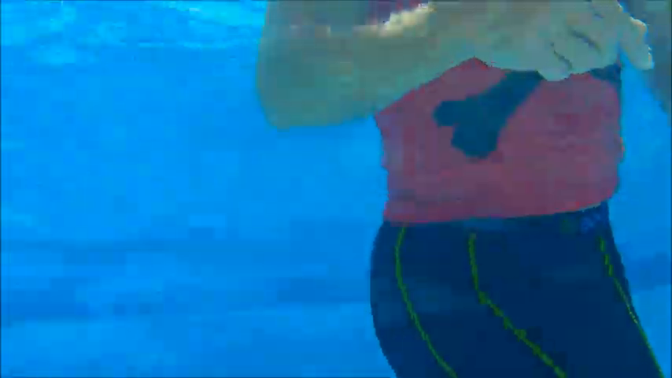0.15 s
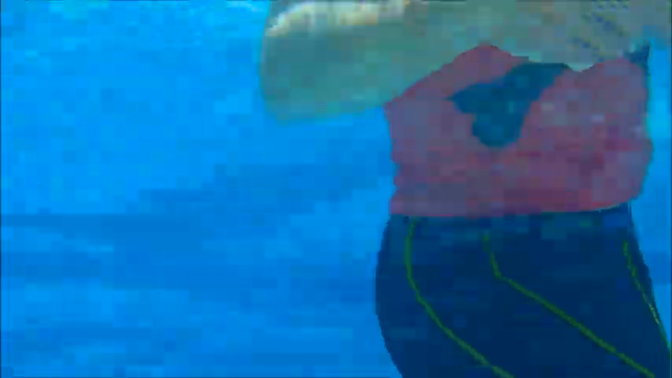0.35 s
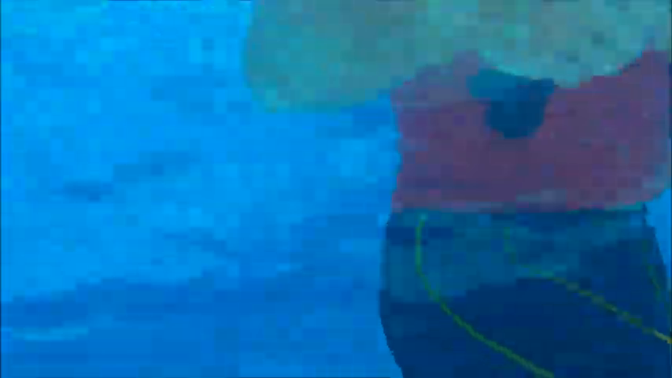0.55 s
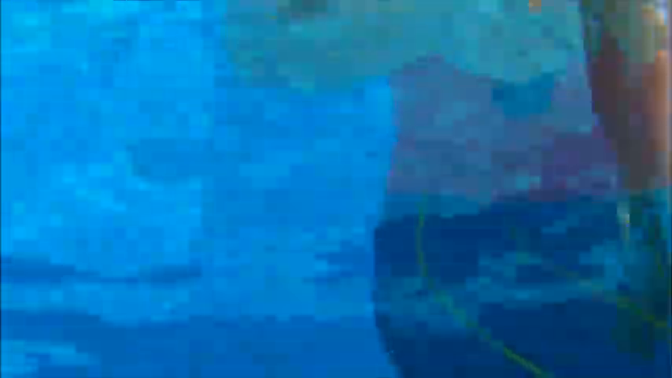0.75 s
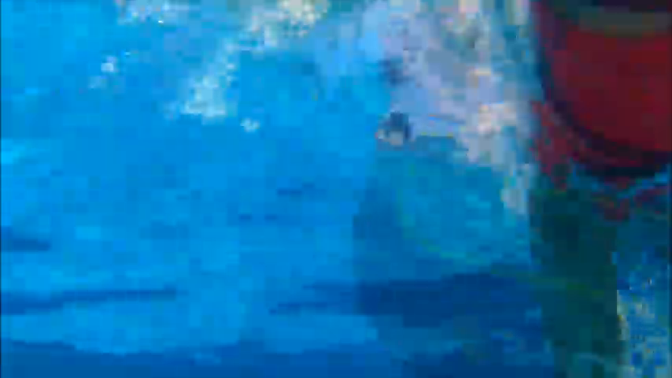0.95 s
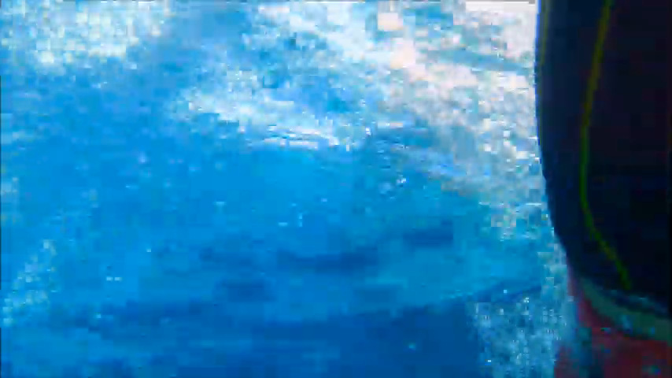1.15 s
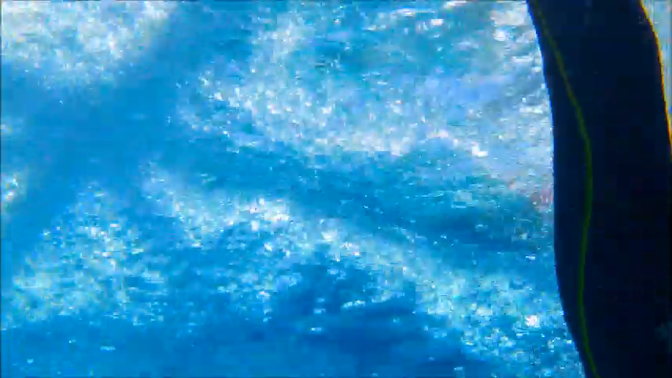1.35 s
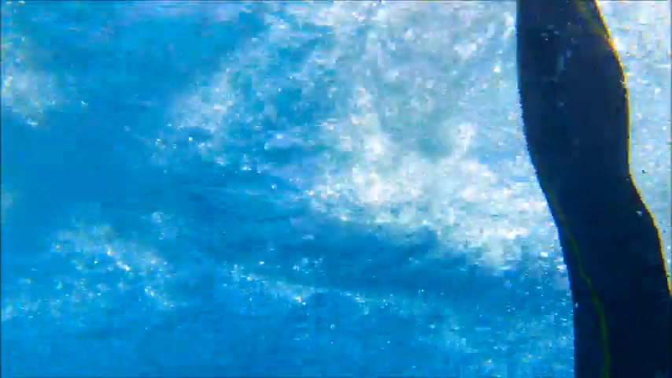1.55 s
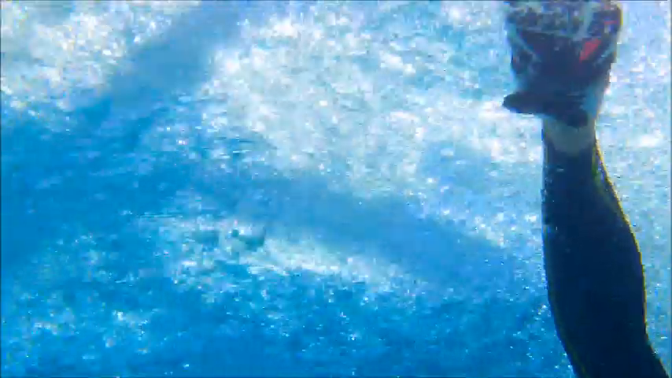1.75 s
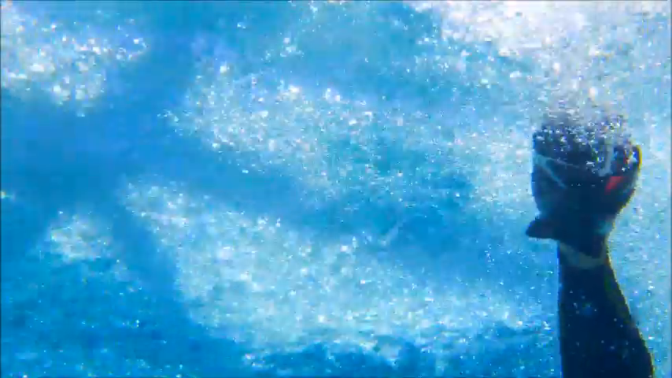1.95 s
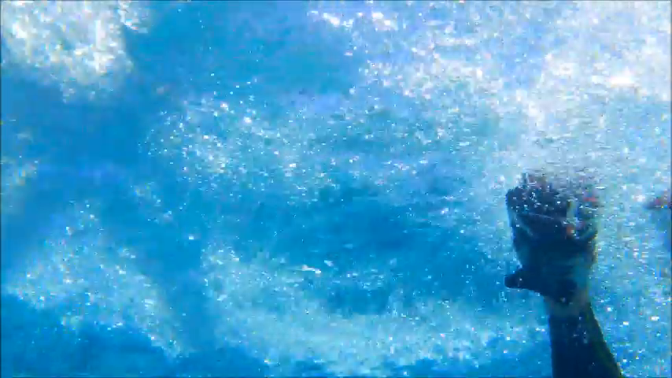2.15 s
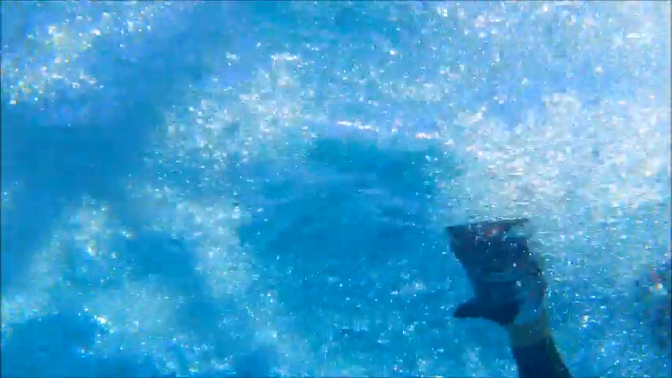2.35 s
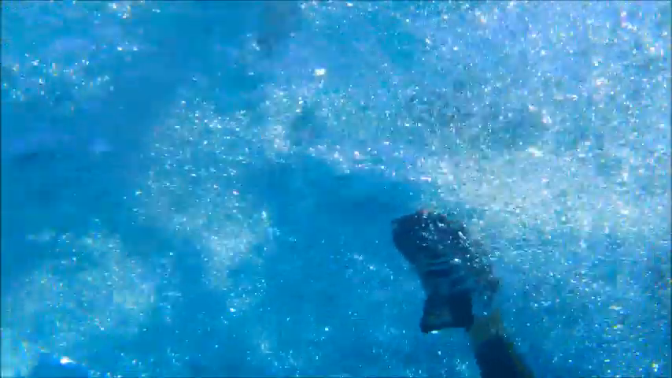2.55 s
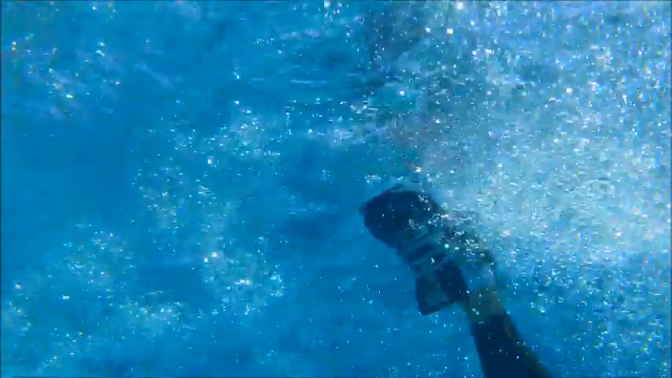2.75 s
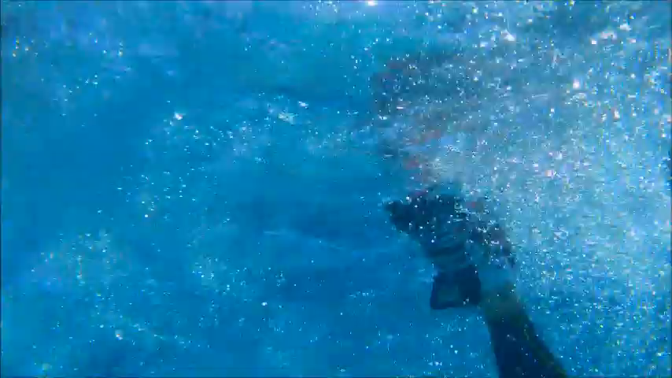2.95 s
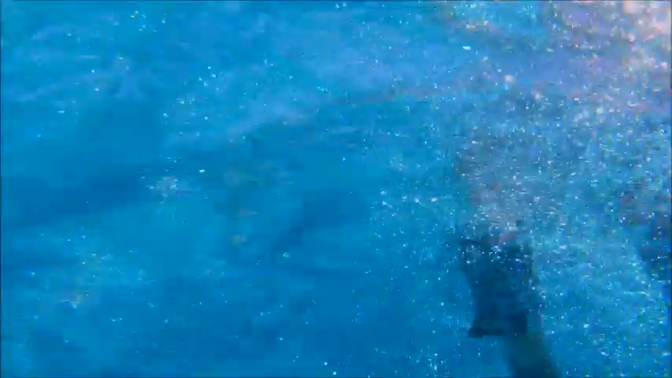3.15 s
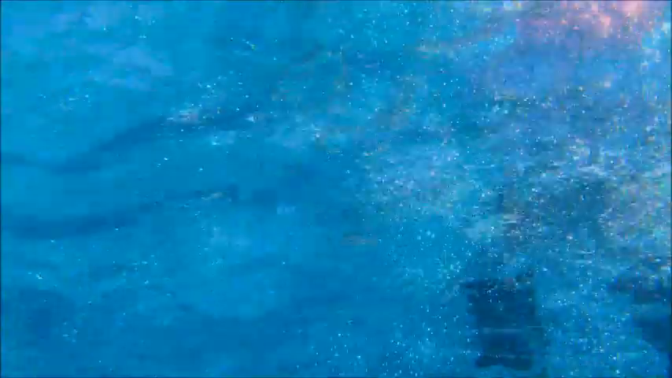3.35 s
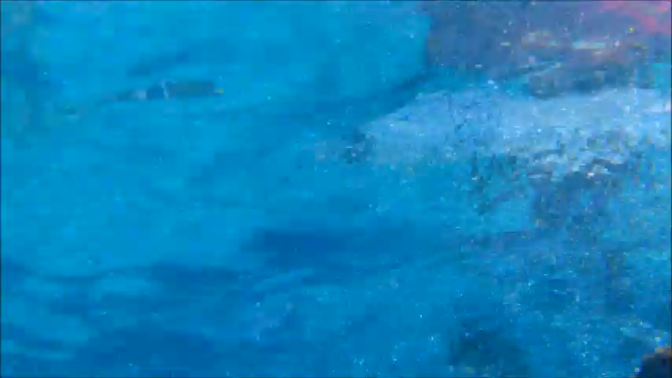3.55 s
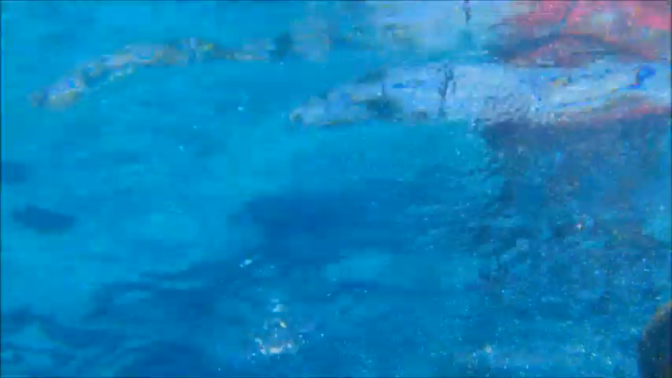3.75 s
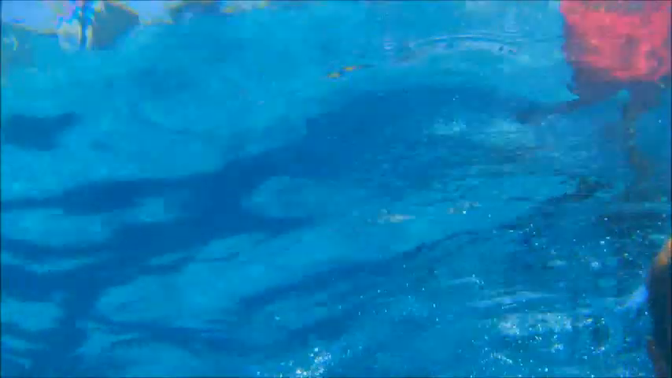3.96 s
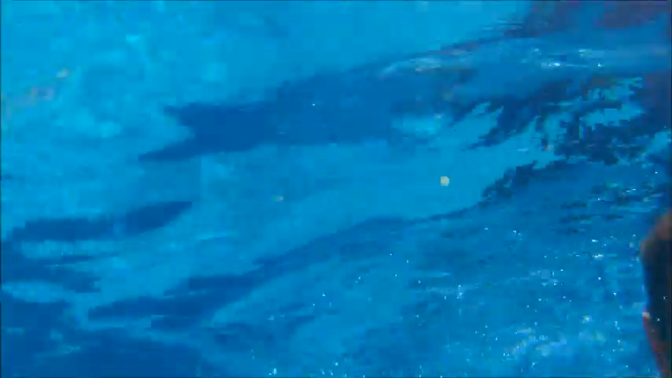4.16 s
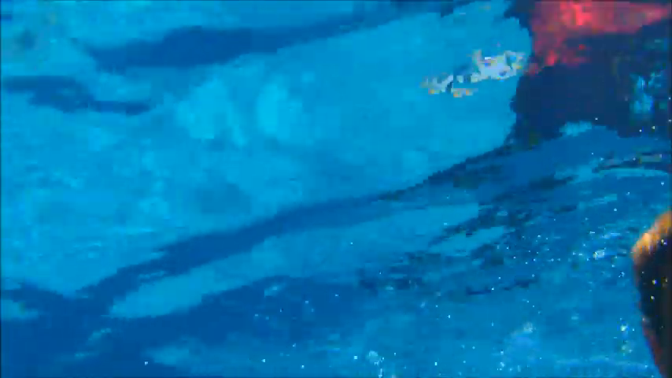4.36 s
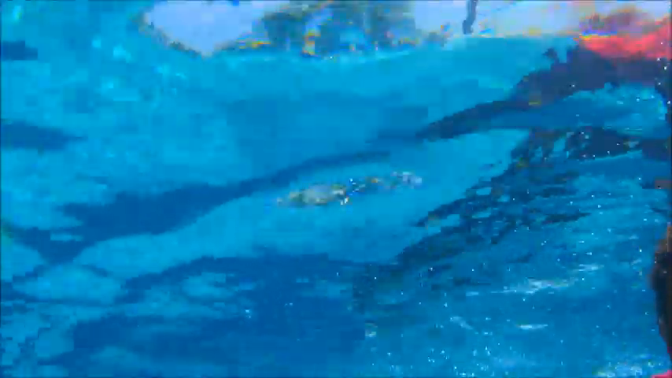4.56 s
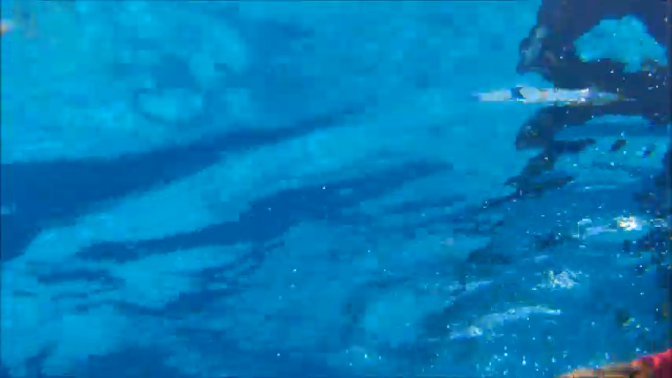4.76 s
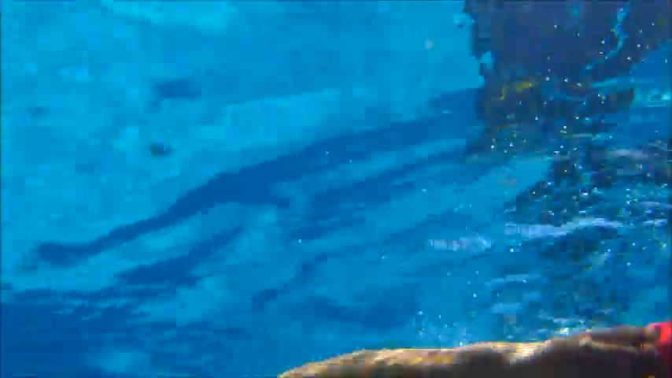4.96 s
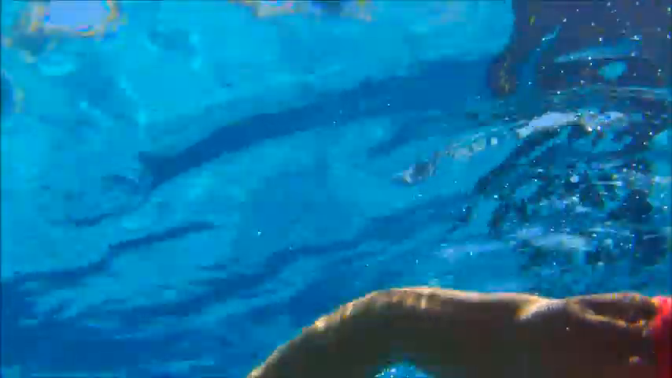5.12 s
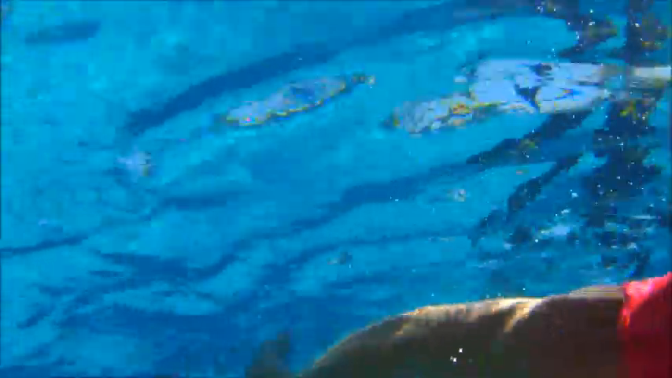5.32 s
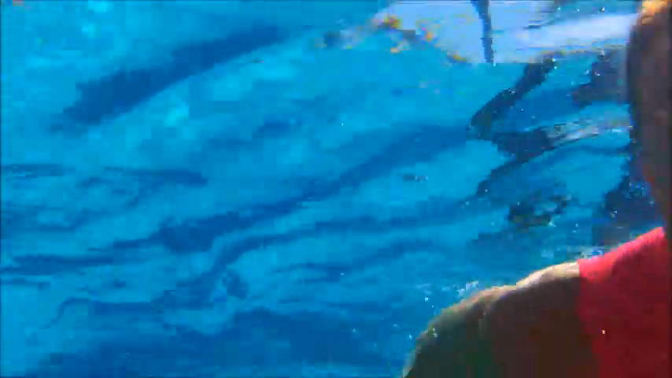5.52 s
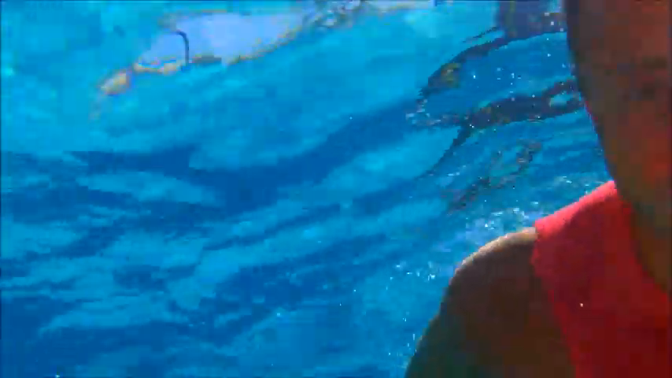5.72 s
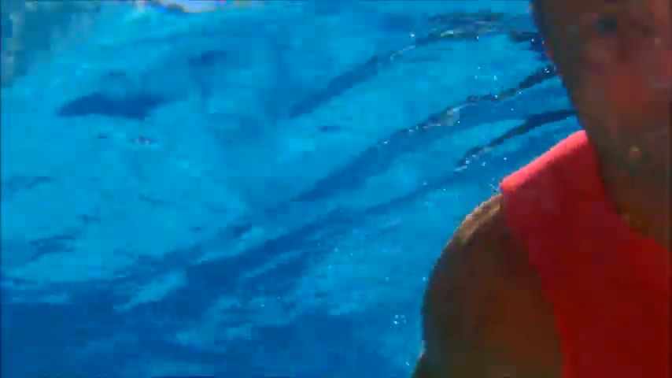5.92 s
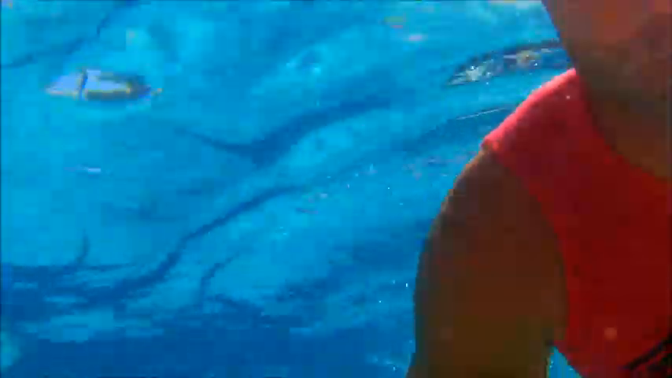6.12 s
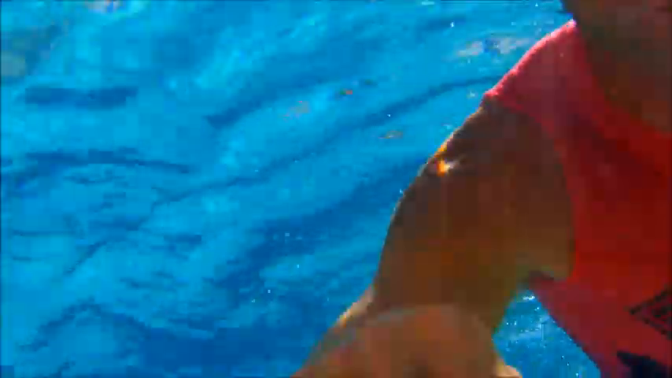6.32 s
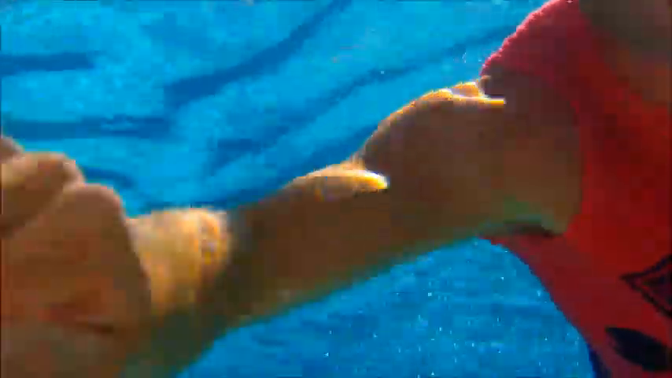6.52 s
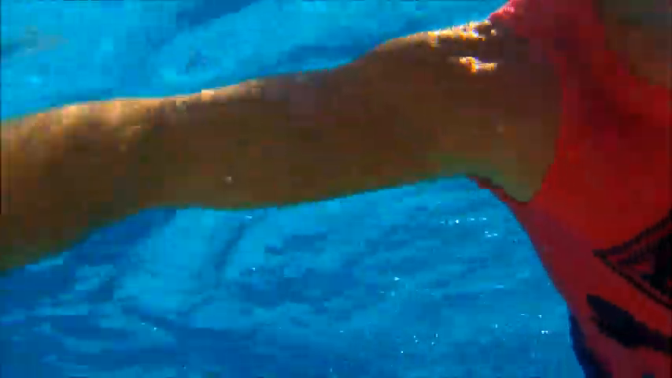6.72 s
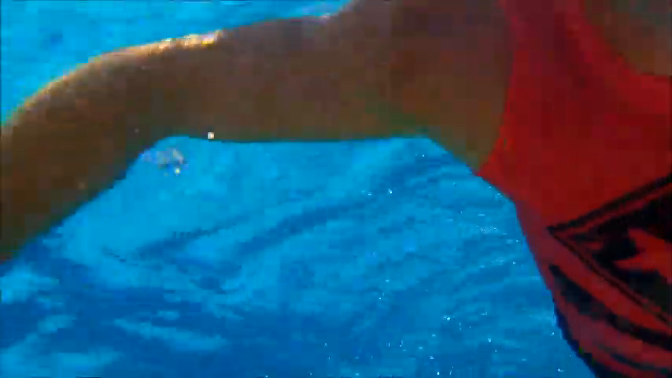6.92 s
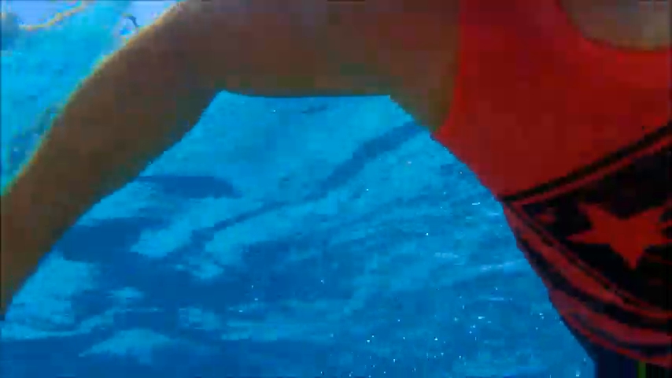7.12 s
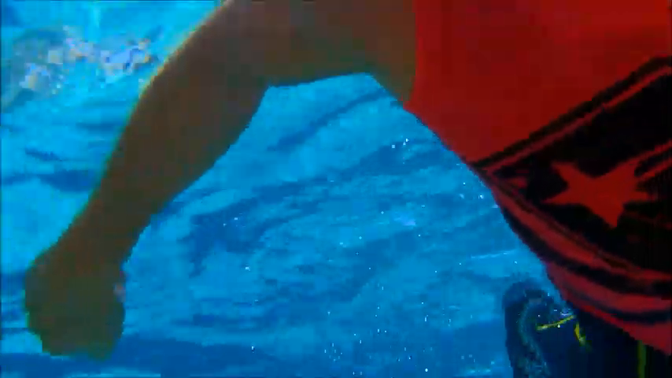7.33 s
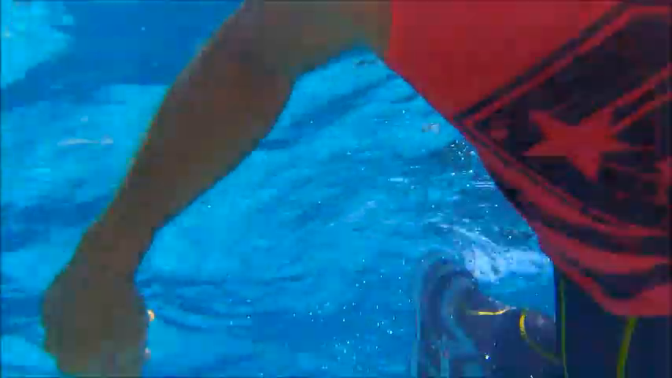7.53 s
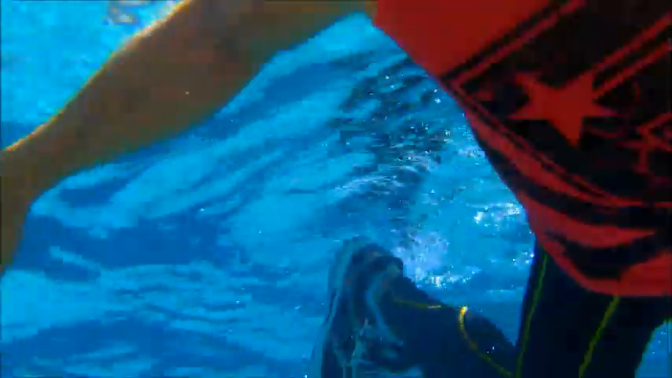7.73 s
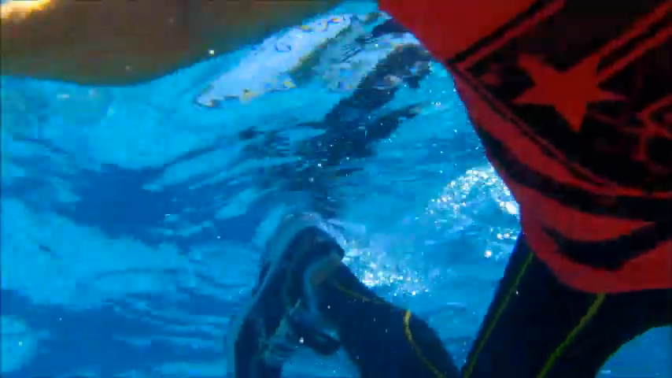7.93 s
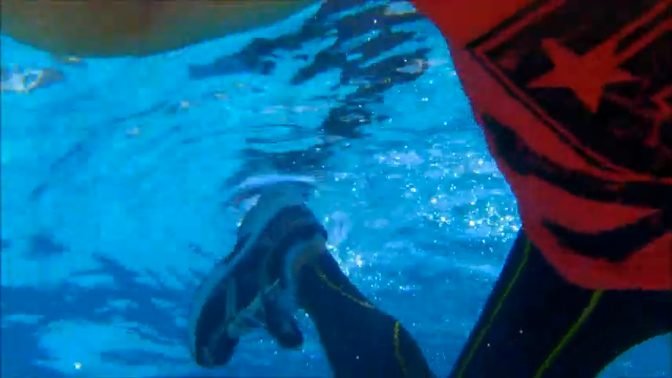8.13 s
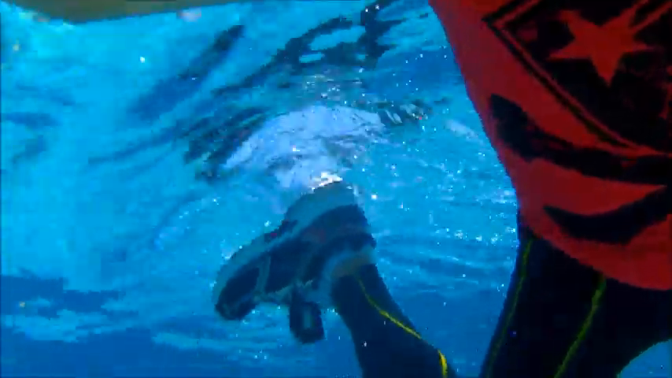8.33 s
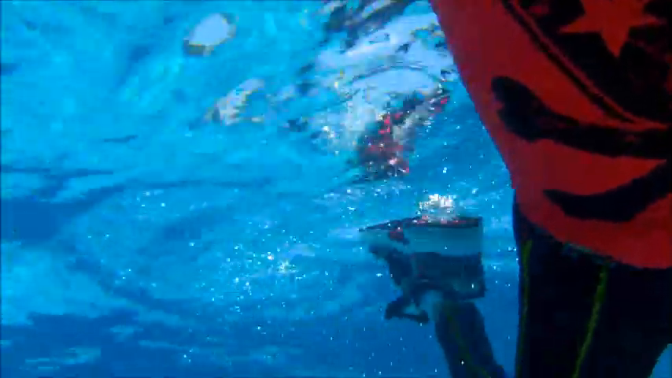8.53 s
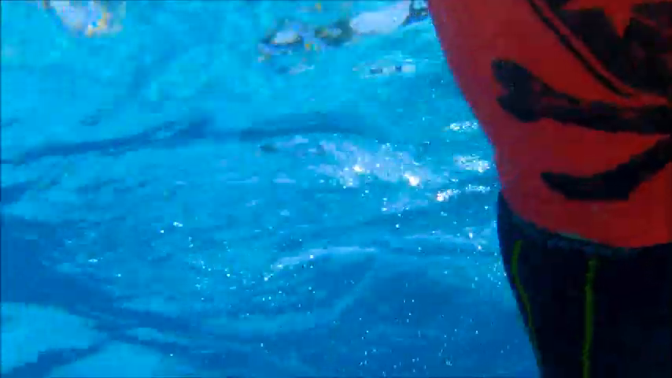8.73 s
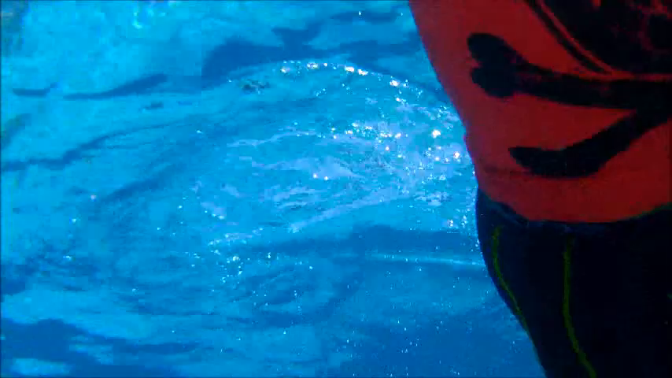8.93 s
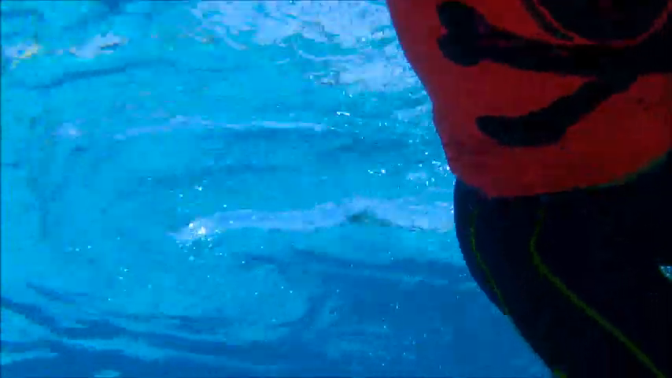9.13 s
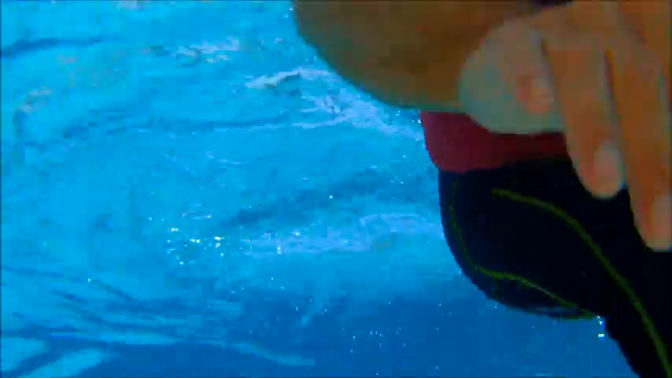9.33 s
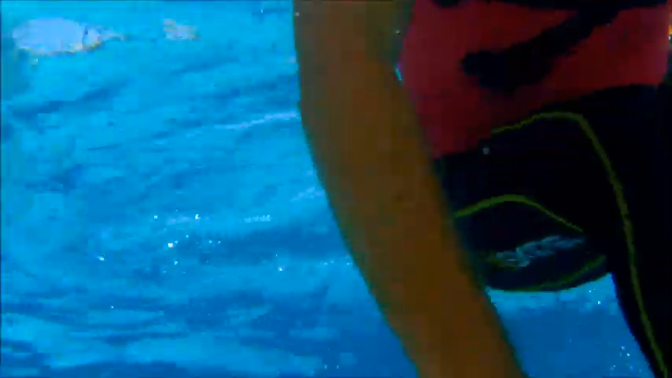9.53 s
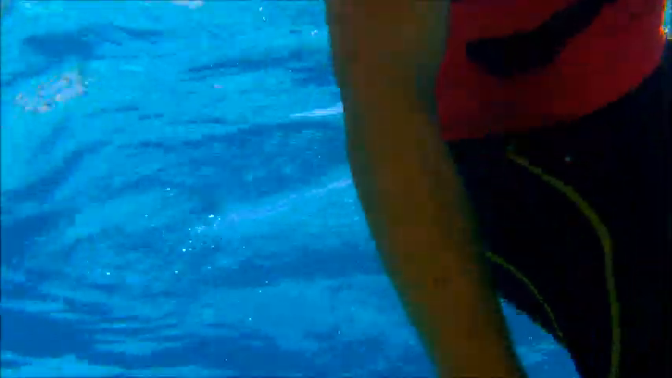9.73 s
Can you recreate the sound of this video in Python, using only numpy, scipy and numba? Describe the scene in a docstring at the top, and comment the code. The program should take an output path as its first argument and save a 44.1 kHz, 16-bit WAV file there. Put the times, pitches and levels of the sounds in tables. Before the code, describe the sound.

Muffled underwater thumps and deep gulping air pockets burst into dense fizzing bubbles, then fade to faint trickles above a low throbbing motor drone.

```python
"""Bubbles under water in a swimming pool

Heard through a camera's waterproof case: a kick drives a surge of air down. Big bubbles gulp and gurgle,
small ones fizz and ping; each is a damped sine. Plumes, churn and splashes are crowds of random bubbles.
Slaps, ticks and squeaks join them, while two pump motors hum and beat underneath as paired sines."""
import sys
import numpy as np
from scipy.fft import rfft, irfft, next_fast_len
from scipy.io import wavfile
from scipy.ndimage import map_coordinates
from numba import njit

SR = 44100
rng = np.random.default_rng(int(sys.argv[2]) if len(sys.argv) > 2 else 0)


def transcribe(signal):
    """Save signal, clipped to [-1, 1], as a 16-bit WAV file at the path in sys.argv[1]."""
    frames = np.atleast_2d(signal).T
    limited = np.clip(frames, -1, 1)
    pcm = np.round(limited * 32767).astype(np.int16)
    wavfile.write(sys.argv[1], SR, pcm)


N = 431298

# Event levels are relative within each table; pitches of ringing events are those at onset.
# small bubbles that pinch off close by: start_s, level_db, pitch_hz
PINGS = [(0.6336, -24, 3000), (0.674, -18.5, 3150), (0.681, -20, 2020), (0.8747, -23, 2260),
         (1.2, -11, 3070), (1.2778, -13, 2350), (1.3189, -12.5, 2210), (1.371, -15, 3110),
         (1.589, -16.5, 2020), (1.745, -14, 2300), (1.8594, -14, 3000), (1.8758, -7, 3200),
         (1.903, -10, 3060), (1.948, -10, 3110), (2.389, -19, 3000), (2.4673, -22, 3160),
         (2.769, -29, 2600), (2.882, -24, 3270), (2.91, -21.5, 3400), (2.9306, -19.5, 3280),
         (3.0654, -24, 2230), (3.7766, -22, 2130), (3.9657, -24, 2570), (4.008, -22, 3980),
         (4.021, -23, 3120), (4.1107, -27, 3040), (4.19, -21.5, 2380), (4.516, -29.5, 2280),
         (4.563, -34, 1960), (5.6143, -27, 3320), (5.719, -30.5, 2320), (5.835, -21, 3130),
         (5.86, -23, 3160), (6.114, -34, 3090), (7.666, -27.5, 1960), (7.8305, -33, 2690),
         (7.9353, -32, 3710), (8.118, -27, 3040), (8.5624, -27.5, 3500), (8.775, -27, 2930),
         (8.96, -24.5, 3900), (9.3595, -26.5, 2010), (9.4807, -23, 2920), (9.6937, -28, 3218)]
# ticks on the case: start_s, level_db, pitch_hz
TICKS = [(0.5194, -26, 4470), (0.674, -25, 4140), (1.199, -17.5, 4000), (3.044, -34, 4500),
         (4.1185, -35, 4100), (4.1455, -26, 3900), (5.345, -29.5, 4070), (5.456, -37, 4300),
         (5.669, -38, 3770), (6.3995, -36, 4420), (6.784, -44.5, 1600), (8.977, -29, 4300),
         (9.09, -41, 5600)]
# large pockets of air: start_s, level_db, pitch_hz
GULPS = [(0.474, -24, 469), (0.676, -25, 485), (0.692, -23, 495), (0.815, -21, 475), (0.968, -11, 421),
         (1.133, -13, 400), (1.235, -9.5, 470), (1.366, -12, 450), (1.5, -15, 452), (1.832, -16.5, 480),
         (1.896, -15, 469), (2.028, -20, 490), (2.245, -23, 470), (2.503, -23, 430), (2.645, -25, 500),
         (2.735, -24, 485), (2.778, -24, 476), (2.93, -24.5, 462), (3.166, -18, 493), (3.627, -25, 440),
         (3.965, -25.5, 460), (4.42, -29, 500), (4.809, -27.5, 464), (5.01, -29.5, 444), (5.39, -26.5, 478),
         (5.92, -30, 450), (6.932, -28, 396), (7.15, -32, 440), (7.212, -28, 408), (7.32, -29, 445),
         (7.353, -31, 396), (7.829, -27.5, 455), (7.885, -32, 470), (8.681, -32, 514), (8.77, -31, 450),
         (8.845, -30, 435), (8.92, -29, 456), (9.013, -21, 426)]
# water slapping the case: start_s, level_db, pitch_hz
THUMPS = [(0.932, -15, 50.3), (1.012, -17, 60.4), (1.237, -7.5, 205), (1.335, -19, 64.5),
          (1.573, -12.5, 176), (9.014, -23, 151)]
# faint squeaks: start_s, length_s, peak_pitch_hz, level_db, octave_db (overtone relative to the tone)
SQUEAKS = [(0.485, .078, 2090, -35.5, -20), (3.362, .122, 1950, -44, -2), (3.525, .04, 1930, -50, -1),
           (3.64, .095, 2200, -47.5, -18), (5.26, .072, 1970, -48, -5), (5.338, .075, 1970, -43.5, -11),
           (8.65, .1, 1950, -49, -8)]
# small splashes, each a short spray of bubbles: start_s, level_db
SPLASHES = [(0.453, -34.5), (0.504, -37.5), (0.748, -32), (0.871, -26.5), (1.385, -25.5), (3.02, -42),
            (3.058, -37), (3.17, -41), (3.675, -43), (3.767, -40), (3.821, -43), (4.365, -45), (4.71, -42),
            (5.339, -44), (5.39, -45), (5.69, -45), (5.77, -48), (6.1, -54), (6.367, -45), (6.395, -46),
            (6.489, -48), (6.73, -46), (6.78, -51), (7.794, -52), (8.448, -43.5), (8.5, -49), (8.55, -49),
            (9.125, -46), (9.251, -39.5), (9.31, -40), (9.351, -39), (9.376, -40.5), (9.61, -45),
            (9.652, -38.5)]
# strokes of the limbs that drag air under: start_s, length_s, fizz_db (small), gurgle_db (big bubbles)
STROKES = [(-0.1, .3, -54, -47.5), (0.46, .08, -36, -41), (0.69, .12, -33.5, -39), (0.8, .27, -27, -36.5),
           (1.12, .25, -29.5, -31.5), (1.47, .3, -31.5, -32.5), (1.98, .06, -32, -37),
           (2.25, .35, -58, -40), (2.87, .1, -43, -38), (3.327, .3, -49, -43), (3.71, .2, -46, -49),
           (4.2, .2, -50, -44), (4.7, .5, -50, -49), (5.678, .25, -56, -47), (7.69, .43, -51.5, -49),
           (8.459, .52, -50.5, -49), (9.19, .5, -50, -58)]
# level curve of air pockets torn loose by the kick: time_s, level_db
CHURNING = [(0.4, -65), (0.55, -43), (0.74, -58), (0.85, -40), (1.15, -28), (1.37, -32.5), (1.4, -36.5),
            (1.56, -32), (2.0, -40), (2.6, -62)]
# shoves of water against the case: middle_s, half_width_s, level_db
SHOVES = [(0.93, 0.079, -28), (1.32, 0.043, -26.5)]
# clouds of bubbles further off: middle_s, half_width_s, level_db
FAR_CLOUDS = [(0.93, .2, -34), (4.92, .21, -46), (7.95, .17, -49)]

# Filter curves, each with columns frequency_hz, relative gain_db
# big bubbles through the case
GURGLE_SPECTRUM = [(180, -35.5), (300, -32), (335, -8), (420, -0.5), (510, 3.5), (560, -6.5), (620, -19.5),
                   (730, -13), (950, -27.5), (1400, -54.5)]
# small bubbles and spray
FIZZ_SPECTRUM = [(500, -16), (800, -7), (980, -21.5), (1100, -13), (1650, -9), (2000, -1.5), (2350, -1),
                 (2620, -5), (3150, -0.5), (3750, -3), (4300, -8), (5000, -10.5), (6800, -22.5),
                 (9700, -24), (14000, -41)]
# churning air pockets
CHURN_SPECTRUM = [(60, -6), (100, -33), (160, -7.5), (215, 5.5), (310, -2), (420, 5.5), (600, -50),
                  (950, -66)]
# water pushed against the case
PUSH_SPECTRUM = [(15, 0.5), (30, 1.5), (75, 0), (110, -8), (170, -3.5), (400, -86)]
# background hiss
HISS_SPECTRUM = [(15, 6.5), (35, 11), (70, 4), (110, 0), (280, -3.5), (450, 2), (700, -9.5), (1000, -11.5),
                 (3000, -11), (6000, -17.5), (10000, -19), (15000, -21.5)]
# distant bubbles, dulled
FAR_SPECTRUM = [(700, -15.5), (1150, 0.5), (1600, -2.5), (2200, 8.5), (3300, -1.5), (6000, -19)]
# span of the louder background: start_s, end_s
SWELL_SPAN_S = (2.87, 4.39)

TOP_HZ, NOTCH_HZ = 15300, 7850
# a plume fills quickly and thins out as it rises
PLUME_RISE_S = .045
CALM_FADE_DB_PER_S, FADE_SLOWING_PER_DB = 28, 0.0171  # fade at calm level; exponential slowing above it
CALM_FIZZ_DB, CALM_GURGLE_DB = -57, -52
WAKE_DB = -9.5  # the push between shoves, relative to the churn
HUM_DB, VANE_DB, HISS_DB = -41.5, -56.5, -50  # before the swell and clear-water boosts
SECOND_MOTOR_DB = -47.5
SWELL_HUM_DB, SWELL_HISS_DB = 6, 4  # boosts during the swell
CLEAR_VANE_DB, CLEAR_HISS_DB = 10, 4  # boosts in the clear water before the kick
BEAT_HZ, BEAT_START_TURNS, BEAT_LAG_TURNS = 2.005, -.29, .2
REFERENCE_FIZZ_DB = -46  # plume level at which the cloud has thickness 1
CRACKLE_DB, WASH_DB, PLIP_DB = -0.5, -5, -15  # relative to the plume, at thickness 1
BURSTS_PER_S, BURSTS_GROW = 140, .75  # rate at thickness 1; power of the thickness
FUSING = 0.2  # dB that single bursts sink into the wash for each dB of thick cloud
BURST_SPREAD_DB, GURGLE_SPREAD_DB = 11, 5  # nearest bubbles over the farthest
PING_CYCLES, PING_SWELL_CYCLES = 4.2, 5  # decay and rise of a ping
TICK_CYCLES, TICK_SWELL_CYCLES = 2.2, 2.4  # decay and rise of a tick
GULP_RISE, PING_RISE = .04, .01  # the pitch climbs by twice this share in one decay time
SQUEAK_WAVER, SQUEAK_HOARSE_PER_DB = .011, .06  # pitch scatter at -46 dB; exponential growth with level


def amp(db):
    """Decibel law: amplitude gain is ten to the power dB/20."""
    return 10 ** (np.asarray(db) / 20)


def unit(x):
    """Normalisation: scale to an rms of 1."""
    return x / np.sqrt(np.mean(x ** 2) + 1e-20)


def clock():
    """Uniform sampling: the time of every sample in seconds."""
    return np.arange(N) / SR


def level_curve(rows):
    """Linear interpolation of (time, level) rows at every sample."""
    time_s, level_db = np.transpose(rows)
    return np.interp(clock(), time_s, level_db)


def during(start, end):
    """Gating: 1 between two times and 0 outside, with soft edges."""
    t = clock()
    return np.clip(.5 + np.minimum(t - start, end - t) / .04, 0, 1)


def swells(rows):
    """Gaussian envelopes: a bell-shaped gain for each (middle, half width, level) row."""
    t = clock()
    return sum(amp(db) * np.exp(-((t - s) / width) ** 2) for s, width, db in rows)


def wobble(rate):
    """Band-limited randomness: a smooth curve through random knots, rate of them a second."""
    knots = rng.standard_normal(int(N * rate / SR) + 4)
    return map_coordinates(knots, [np.arange(N) * rate / SR])


def coloured(x, spectrum):
    """Minimum-phase filtering: the folded cepstrum makes a causal filter; the output has rms 1."""
    m = 2 * next_fast_len(N // 2 + 8192)
    hz, db = np.transpose(spectrum)
    bins_hz = np.fft.rfftfreq(m, 1 / SR)
    gain_db = np.interp(np.log(bins_hz + 1), np.log(hz), db)
    cepstrum = irfft(np.log(amp(gain_db)))
    cepstrum[1:m // 2] *= 2
    cepstrum[m // 2 + 1:] = 0
    response = np.exp(rfft(cepstrum))
    return unit(irfft(rfft(x, m) * response)[:N])


@njit
def ring(times, sizes, pitches, lives, rise, onset, n, sr):
    """Bubble resonance: a damped sine swells over onset cycles, decays over lives cycles and climbs in pitch."""
    out = np.zeros(n)
    for k in range(len(times)):
        start = int(times[k] * sr)
        length = min(int(6 * lives[k] * sr / pitches[k]), n - start)
        for i in range(length):
            cycles = i * pitches[k] / sr
            age = cycles / lives[k]
            envelope = np.exp(-age) * (1 - np.exp(-cycles / onset))
            out[start + i] += sizes[k] * envelope * np.sin(2 * np.pi * cycles * (1 + rise * age))
    return out


def swarm(rate, low_hz, high_hz, life, spread_db, rise, clump_db):
    """Random superposition: bubbles at a changing rate a second, in clumps with lulls between."""
    born = np.cumsum(rate * amp(clump_db * wobble(35))) / SR
    when, pitch, size, damping = rng.random((int(born[-1]), 4)).T
    at = np.minimum(np.searchsorted(born, when * born[-1]), N - 1)
    hz = low_hz + (high_hz - low_hz) * pitch
    nearness = amp(spread_db * size ** 3)  # a few are near, most are far
    sizes = nearness * np.sqrt(hz / rate[at])  # offsets short rings and crowding
    return unit(ring(at / SR, sizes, hz, life * (.5 + damping), rise, 0.42, N, SR))


def bursts(rate, low_hz, high_hz, span_s, detune_octaves, life, spread_db, count):
    """Fragmentation: air tears apart into bursts of count bubbles of like size within milliseconds."""
    born = np.cumsum(rate * np.ones(N)) / SR
    draws = rng.random((int(born[-1]), count + 1, 3))
    when, pitch, size = np.moveaxis(draws[:, :1], 2, 0)  # one draw for the whole burst
    delay, detune, share = np.moveaxis(draws[:, 1:], 2, 0)  # one for each bubble
    at = np.minimum(np.searchsorted(born, when * born[-1]), N - 1)
    centre_hz = low_hz + (high_hz - low_hz) * pitch
    hz = centre_hz * 2 ** (detune_octaves * (detune - .5))
    sizes = amp(spread_db * size ** 2) * share * np.sqrt(hz / rate[at])
    times = at / SR + span_s * delay ** 2
    lives = np.full(hz.size, float(life))
    return unit(ring(times.ravel(), sizes.ravel(), hz.ravel(), lives, 0.01, 1.5, N, SR))


def pool(x, t60, wet_db):
    """Reverberation: short, dense echoes off surface, floor and case; the moving surface keeps changing them."""
    hop = SR // 16
    blocks = np.pad(x, (0, -N % hop)).reshape(-1, hop)
    decay = amp(-60 * np.arange(hop) / SR / t60)
    tails = rng.standard_normal(blocks.shape) * decay  # a new echo pattern for each block
    tails /= np.linalg.norm(tails, axis=1, keepdims=True)
    echoes = irfft(rfft(blocks, 2 * hop) * rfft(tails, 2 * hop))
    spill = np.pad(echoes[:, hop:].ravel(), (hop, 0))[:N]  # rings on into the next block
    wet = echoes[:, :hop].ravel()[:N] + spill
    return x + amp(wet_db) * wet


def plumes(column, calm_db):
    """Power summation: each stroke fills a plume, feeds it and leaves it to fade in dB; big plumes linger."""
    t = clock()
    power = np.full(N, amp(calm_db) ** 2)
    for start, length, fizz_db, gurgle_db in STROKES:
        db = {"fizz": fizz_db, "gurgle": gurgle_db}[column]
        fill = 1 - np.exp(-np.maximum(t - start, 0) / PLUME_RISE_S)
        fade = CALM_FADE_DB_PER_S * np.exp(-FADE_SLOWING_PER_DB * (db - calm_db))
        faded_db = db - fade * np.maximum(t - start - length, 0)
        power += (fill * amp(faded_db)) ** 2
    return 10 * np.log10(power)


def pump_hum():
    """Beating: two motor tones just under the mains frequency, with mains buzz and a vane tone."""
    t = clock()
    swell, clear = during(*SWELL_SPAN_S), during(-1, SHOVES[0][0])
    hum_db = HUM_DB + SWELL_HUM_DB * swell
    vane_db = VANE_DB + SWELL_HUM_DB * swell + CLEAR_VANE_DB * clear
    # the beat lags a little after the swell
    slip_turns = BEAT_START_TURNS + BEAT_HZ * t - BEAT_LAG_TURNS * during(SWELL_SPAN_S[1], np.inf)
    shaft, mains = 2 * np.pi * 57.03 * t, 2 * np.pi * 60 * t  # phases in radians
    first = amp(hum_db) * np.sin(shaft)
    second = amp(SECOND_MOTOR_DB) * np.sin(shaft + 2 * np.pi * slip_turns)
    mains_hum = amp(hum_db - 14.5) * np.sin(2 * mains)
    vanes = np.sin(6 * shaft + .5 * wobble(2))
    buzz = np.sin(6 * mains)
    return first + second + mains_hum + amp(vane_db) * (vanes + amp(-0.5) * buzz)


def hiss():
    """Broadband noise: a soft filtered hiss, raised in the swell and in the clear water before the kick."""
    swell, clear = during(*SWELL_SPAN_S), during(-1, SHOVES[0][0])
    level_db = HISS_DB + SWELL_HISS_DB * swell + CLEAR_HISS_DB * clear
    return amp(level_db) * coloured(rng.standard_normal(N), HISS_SPECTRUM)


def gurgle():
    """Band-limited resonance: big bubbles ring in the low band the case lets through; louder means more."""
    level_db = plumes("gurgle", CALM_GURGLE_DB)
    rate = 200 * amp(.4 * (level_db + 45.5))
    bubbles = swarm(rate, 300.3, 916, life=5.64, spread_db=GURGLE_SPREAD_DB, rise=0.031, clump_db=1.1)
    return amp(level_db) * coloured(bubbles + rng.standard_normal(N), GURGLE_SPECTRUM)


def fizz():
    """Density of events: bursts crackle over a distant wash, coming faster and fusing as the cloud thickens."""
    level_db = plumes("fizz", CALM_FIZZ_DB)
    thick_db = level_db - REFERENCE_FIZZ_DB
    thickness = amp(thick_db)
    bubbles = bursts(BURSTS_PER_S * thickness ** BURSTS_GROW, 1800, 5060, span_s=.016,
                     detune_octaves=0.913, life=5.2, spread_db=BURST_SPREAD_DB, count=7)
    crackle = coloured(pool(bubbles, t60=0.028, wet_db=-3.5), FIZZ_SPECTRUM)
    swirl = amp(1.4 * wobble(40))
    wash = coloured(rng.standard_normal(N), FIZZ_SPECTRUM) * swirl
    # middle-sized bubbles plip underneath and grow less with the cloud
    plips = swarm(200 * thickness ** .7, 1015, 1433, life=8.6, spread_db=26, rise=0.01, clump_db=3)
    fused_db = FUSING * np.maximum(thick_db, 0)
    mix = amp(CRACKLE_DB - fused_db) * crackle
    mix += amp(WASH_DB + fused_db / 2) * wash
    mix += amp(PLIP_DB - 0.17 * thick_db) * plips
    return amp(level_db) * mix


def surge():
    """Flow noise and resonance: the kick shoves water against the case and tears air into ringing pockets."""
    churn = amp(level_curve(CHURNING)) * during(CHURNING[0][0], CHURNING[-1][0])
    push_gain = swells(SHOVES) + amp(WAKE_DB) * churn
    push = push_gain * coloured(rng.standard_normal(N), PUSH_SPECTRUM)
    pockets = swarm(np.full(N, 170.), 111.4, 419, life=2.0, spread_db=5.0, rise=0.01, clump_db=3.5)
    return amp(2.5) * (push + churn * coloured(pockets, CHURN_SPECTRUM))


def splashes():
    """Entrainment: the surface folds over and drives down a quick spray of bubbles."""
    t = clock()
    strength = np.zeros(N)
    for s, db in SPLASHES:
        age = np.clip((t - s) / 0.0076, 0, 20)
        strength += amp(db) * age * np.exp(1 - age)  # peaks after 7.6 ms
    spray = swarm(np.full(N, 2200.), 1135, 4975, life=5.2, spread_db=6.0, rise=0.0098, clump_db=1)
    return strength * coloured(spray, FIZZ_SPECTRUM)


def gulps():
    """Volume resonance: large air pockets ring low for a few cycles; a softer, usually higher one follows."""
    s, db, hz = np.transpose(GULPS)
    main = ring(s, amp(db + 2.5), hz, np.full(len(s), 3.8), GULP_RISE, 1.1, N, SR)
    delay, pitch = rng.random((len(s), 2)).T
    follower_s = s + .012 + .02 * delay
    follower_hz = 460 + 100 * pitch
    follower = ring(follower_s, amp(db - 7.5), follower_hz, np.full(len(s), 4.), GULP_RISE, 1.1, N, SR)
    return pool(main + follower, t60=0.043, wet_db=-25.0)


def squeaks():
    """Frequency modulation: hoarse tones arch and waver in pitch; tone and overtone flutter apart."""
    out = np.zeros(N)
    for s, length, hz, db, octave_db in SQUEAKS:
        progress = np.clip((clock() - s) / length, 0, 1)
        arch = np.abs(np.sin(np.pi * progress)) ** 0.46
        scatter = SQUEAK_WAVER * np.exp(SQUEAK_HOARSE_PER_DB * (db + 46))
        waver = scatter * (wobble(700) + .7 * wobble(35))
        phase = 2 * np.pi * np.cumsum(hz * (1 - 0.023 * (1 - arch) + waver)) / SR
        tone = unit(amp(3 * wobble(240))) * np.sin(phase)
        overtone = unit(amp(4.5 * wobble(60))) * np.sin(2 * phase)
        out += amp(db) * arch * (tone + amp(octave_db) * overtone)
    return out


def ticks():
    """Impact: tiny contacts with the case ring softly, blurred by dense echoes in the water."""
    s, db, hz = np.transpose(TICKS)
    lives = np.full(len(s), TICK_CYCLES)
    contacts = ring(s, amp(db + 10.5), hz, lives, 0.0048, TICK_SWELL_CYCLES, N, SR)
    return pool(contacts, t60=0.018, wet_db=4.0)


def pings():
    """Pinch-off: a bubble swells into a short ring, then sheds four weaker satellites."""
    s, db, hz = np.transpose(PINGS)
    main = ring(s, amp(db + 8.5), hz, np.full(len(s), PING_CYCLES), PING_RISE, PING_SWELL_CYCLES, N, SR)
    delay, detune = np.moveaxis(rng.random(size=(len(s), 4, 2)), 2, 0)
    times = s[:, None] + .012 * delay
    pitches = hz[:, None] * 2 ** (1.1 * (detune - .45))
    sizes = amp(db[:, None] - 7.0 - 9.7 * delay)  # later ones are weaker
    lives = np.full(times.size, 3.)
    satellites = ring(times.ravel(), sizes.ravel(), pitches.ravel(), lives, 0.011, 1.1, N, SR)
    return pool(main + satellites, t60=.028, wet_db=-11)


def far_clouds():
    """Absorption: distant bubbles come thick and even in size as a soft wash that has lost its treble."""
    bubbles = swarm(np.full(N, 1500.), 810, 4800, life=6.0, spread_db=8, rise=0.016, clump_db=1.5)
    return swells(FAR_CLOUDS) * coloured(bubbles, FAR_SPECTRUM)


def thumps():
    """Heavy damping: slaps of water against the case die within about a cycle, dull and dead."""
    s, db, hz = np.transpose(THUMPS)
    return ring(s, amp(db + 1.0), hz, np.full(len(s), .7), 0.042, 0.25, N, SR)


def scene():
    """Superposition: everything reaches one microphone inside the case."""
    background = pump_hum() + hiss()
    clouds = gurgle() + fizz() + surge() + splashes() + far_clouds()
    events = gulps() + squeaks() + ticks() + pings() + thumps()
    return (background + clouds + events)[None]


def record(dry):
    """Band limiting: the camera has a deep notch in the treble and keeps nothing above its band limit."""
    m = next_fast_len(N + SR // 2)
    hz = np.fft.rfftfreq(m, 1 / SR)
    offset_hz = hz - NOTCH_HZ
    notch = (offset_hz / np.hypot(offset_hz, 700)) ** 2  # gain is half at 700 Hz to either side
    return irfft(rfft(dry, m) * notch * (hz < TOP_HZ), m)[..., :N]


dry = scene()
out = record(dry)
transcribe(out)
```